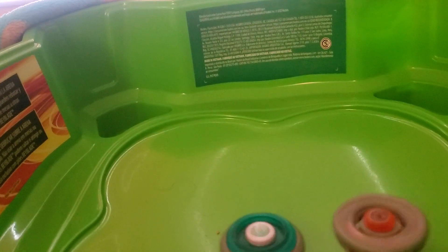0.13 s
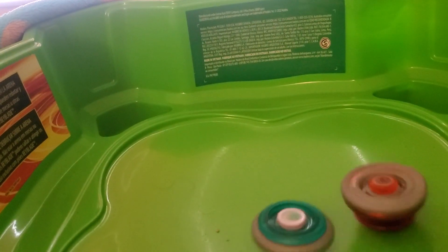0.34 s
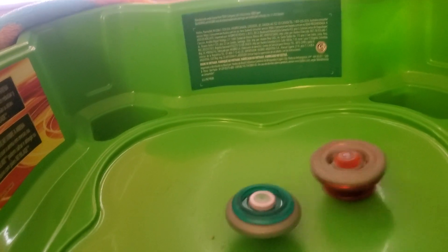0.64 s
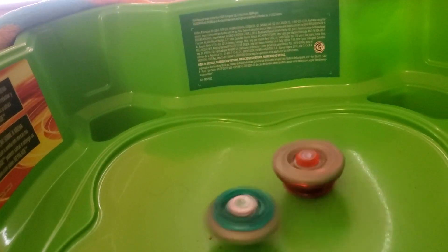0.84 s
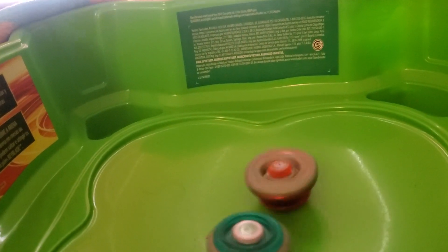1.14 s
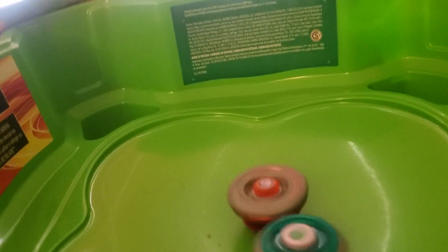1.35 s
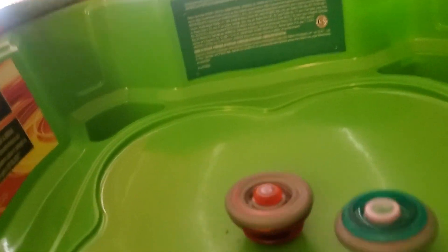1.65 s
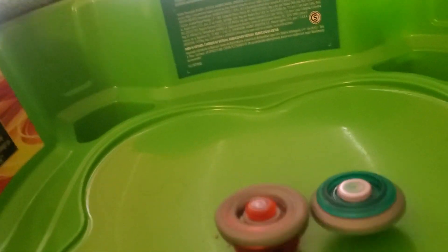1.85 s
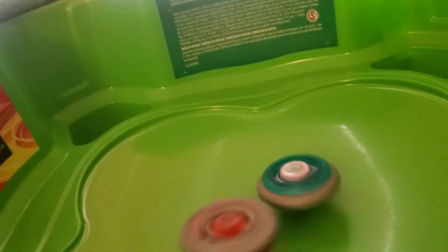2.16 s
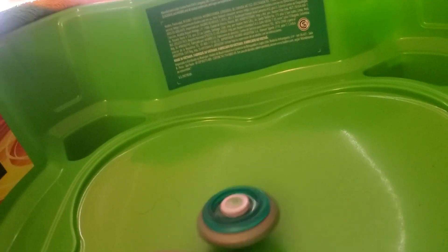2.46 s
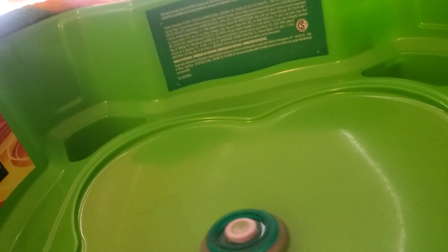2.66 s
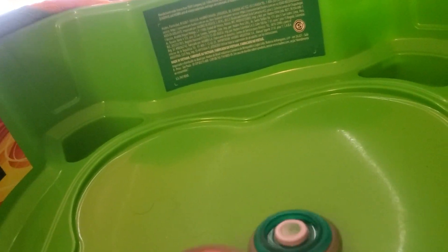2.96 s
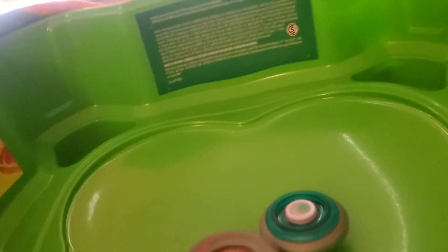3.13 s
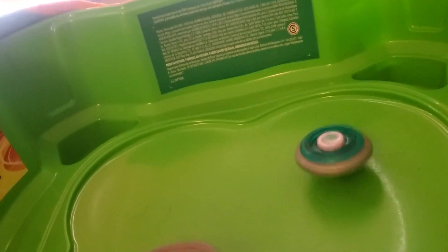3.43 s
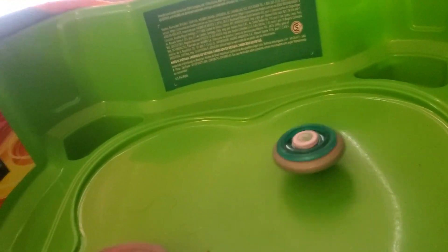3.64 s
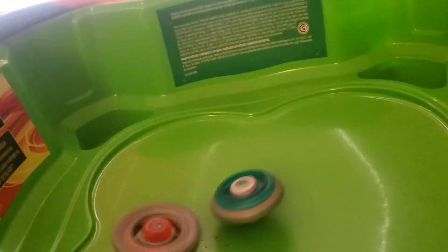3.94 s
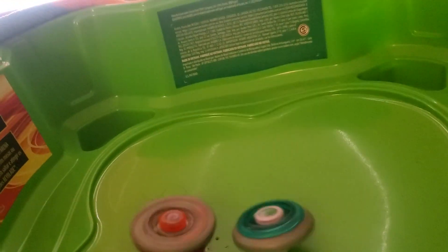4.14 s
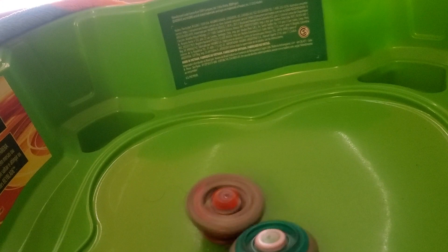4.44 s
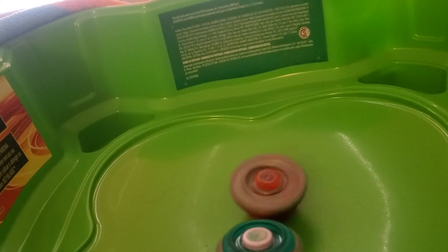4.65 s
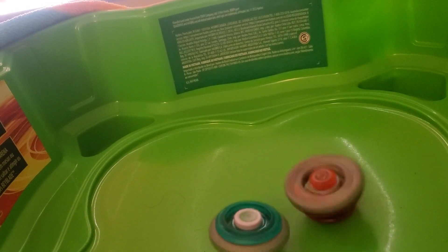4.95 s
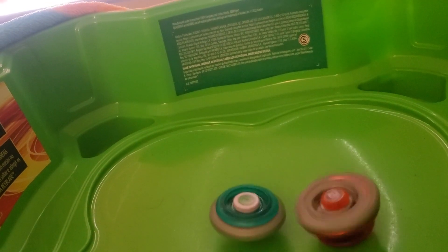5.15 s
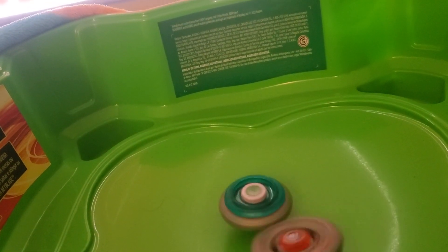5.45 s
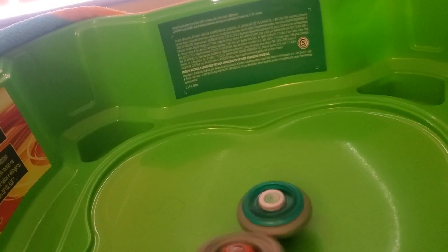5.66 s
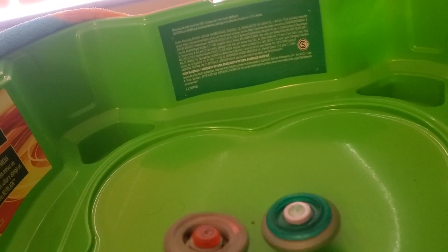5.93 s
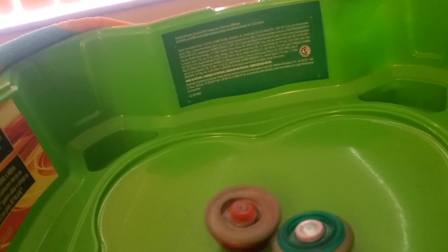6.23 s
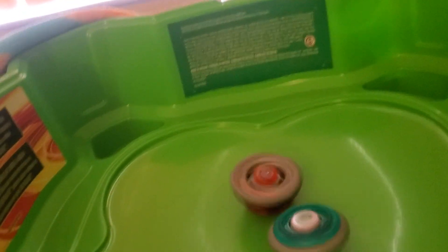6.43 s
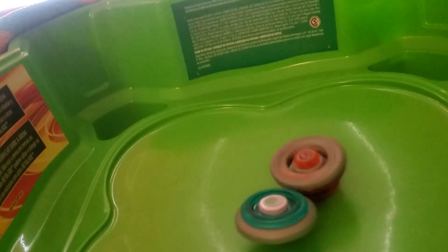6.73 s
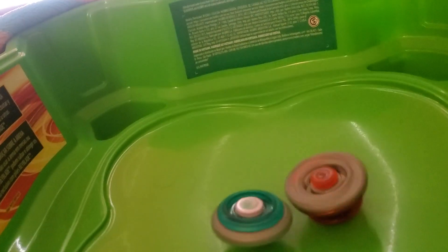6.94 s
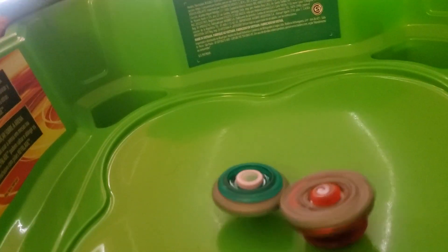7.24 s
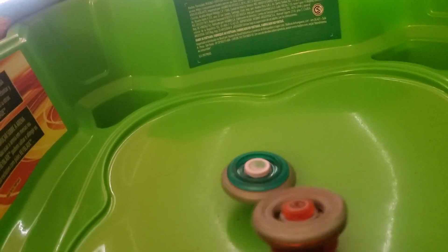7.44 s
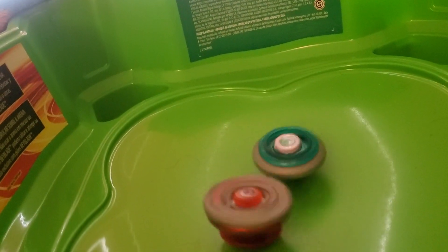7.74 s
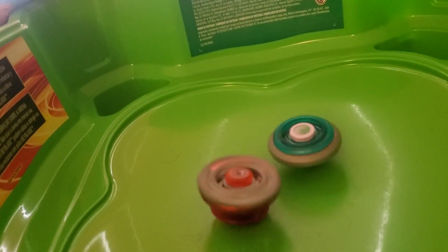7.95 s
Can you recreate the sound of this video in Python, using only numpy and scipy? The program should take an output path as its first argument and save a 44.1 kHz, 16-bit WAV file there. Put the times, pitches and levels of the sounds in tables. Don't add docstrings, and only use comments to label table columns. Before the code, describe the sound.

Two spinning tops with metal rings circle in a thin plastic arena, recorded very close in stereo in a small room. Sharp clacks come every few tenths of a second, some ringing metallically, with hollow booms as tips hop and land. After a busy first half the rims only tick and rub softly over rolling rumble, then one hard clash and several spaced clacks follow.

```python
import sys
import numpy as np
from scipy import signal
from scipy.fft import rfft, irfft, next_fast_len
from scipy.io import wavfile

SR = 44100
rng = np.random.default_rng(int(sys.argv[2]) if len(sys.argv) > 2 else 0)


def convert_level_to_amplitude(level_db):
    exponent = np.asarray(level_db, float) / 20
    return 10 ** exponent


def transcribe(signal):
    frames = np.atleast_2d(signal).T
    limited = np.clip(frames, -1, 1)
    pcm = np.round(limited * 32767).astype(np.int16)
    wavfile.write(sys.argv[1], SR, pcm)


N = 356769
SIZE = next_fast_len(N + SR)
HZ = np.maximum(np.arange(SIZE // 2 + 1) * SR / SIZE, 1)

# start_s, crack_db, blow_db (into arena and room)
RIM_CLACKS = [(0.168, -11, -41), (0.174, -11, -36), (0.1802, -11.5, -20.5), (0.5431, -13, -37),
              (0.553, -16, -20.5), (0.9284, -7.5, -21.5), (1.3327, -5.5, -26.5), (1.4525, -8.5, -47),
              (1.5, -15.5, -28.5), (1.906, -7.5, -25), (1.996, -12, -47), (2.1342, -19.5, -33),
              (2.146, -13.5, -45.5), (2.2345, -12.5, -18.5), (2.7014, -8.5, -41.5), (2.7128, -11, -24),
              (3.1346, -15.5, -27.5), (3.2849, -11, -35), (3.29, -22, -47.5), (3.3449, -19.5, -47),
              (3.4279, -8.5, -17.5), (4.104, -10.5, -38), (4.1142, -8, -31), (4.373, -8.5, -27.5),
              (4.57, -23, -39), (4.592, -26, -70.5), (6.352, -11, -26), (6.8208, -9, -38.5),
              (6.998, -14.5, -34), (7.322, -11, -57), (7.777, -4.5, -51)]
# time_s, rumble_db
ROLLING_WEIGHT = [(0.0, -43.5), (0.7, -42.5), (0.81, -73), (0.93, -50), (1.8, -49), (2.6, -46.5),
                  (2.86, -47), (2.97, -64.5), (3.13, -45.5), (3.85, -47.5), (4.02, -35.5), (4.55, -52.5),
                  (4.66, -39), (4.87, -37), (4.96, -42), (6.1, -39.5), (7.3, -46), (8.09, -47.5)]
# pitch_hz, level_db (per Hz)
TICK_COLOUR = [(2940, -36.5), (5000, -11.5), (6690, 1), (9000, -12.5), (11000, -3.5), (14400, -5.5),
               (15900, -1.5), (17000, -30.5)]


def at_hz(points):
    hz, value = np.array(points, float).T
    return np.interp(np.log(HZ), np.log(np.maximum(hz, 1)), value)


def causal(db):
    grid = np.linspace(0, SR / 2, 8193)
    cepstrum = irfft(np.interp(grid, HZ, db) * np.log(10) / 20)
    cepstrum[1:8192] *= 2
    cepstrum[8193:] = 0
    return convert_level_to_amplitude(db) * np.exp(1j * np.interp(HZ, grid, rfft(cepstrum).imag))


def coloured(x, spectrum):
    return irfft(rfft(x, SIZE) * causal(at_hz(spectrum)), SIZE)[..., :N]


def filtered(x, hz, kind="low"):
    return signal.sosfilt(signal.butter(2, hz, kind, fs=SR, output="sos"), x)


def rms_one(x):
    return x / np.sqrt(np.mean(x ** 2) + 1e-20)


def clicks(times, sizes):
    track = np.full(N, 1e-18, dtype=np.asarray(sizes).dtype)
    np.add.at(track, np.minimum((np.asarray(times) * SR).astype(int), N - 1), sizes)
    return track


def decay(push, t60):
    return signal.lfilter([1], [1, -convert_level_to_amplitude(-60 / (t60 * SR))], push)


def burst(push, t60):
    return decay(push, t60) * rng.standard_normal(N)


def ring(push, hz, t60):
    return signal.lfilter([1], [1, -convert_level_to_amplitude(-60 / (t60 * SR)) * np.exp(2j * np.pi * hz / SR)], push)


def sing(push, hz, t60):
    swell_s = 0.00068
    keep = np.array([convert_level_to_amplitude(-60 / (t60 * SR)), np.exp(-1 / (swell_s * SR))])
    return signal.lfilter([1 - keep[1]], np.poly(keep * np.exp(2j * np.pi * hz / SR)), push)


def patter(turn, per_s, spread_db, wobble):
    rate = per_s * np.exp(wobble * np.cos(turn))
    sizes = convert_level_to_amplitude(spread_db * np.minimum(rng.exponential(1, N), 4)) * rng.choice([-1, 1], N)
    return sizes * (rng.random(N) < rate / SR) + 1e-18


def room_hush():
    # pitch_hz, level_db (per Hz)
    hush_colour = [(18, -46.5), (30, 1), (76, 6.5), (383, -21), (541, -38.5), (705, -12), (2590, -28),
                   (4280, -23.5), (8090, -35.5), (14100, -35.5), (17000, -60.5)]
    hush_db, shake_db = -54.5, -71.5
    shared, own = rng.standard_normal(N), rng.standard_normal((2, N))
    hush = convert_level_to_amplitude(hush_db) * rms_one(coloured(shared + 1.5 * own, hush_colour))
    shake = filtered(own[0], [25, 90], "band")
    return hush + convert_level_to_amplitude(shake_db) * rms_one(shake) * [[1], [-1]]


def room(x):
    # pitch_hz, t60_s
    room_decay = [(400, 0.2), (1000, 0.26), (4000, 0.29), (9000, 0.26), (16000, 0.11)]
    decay_hz, decay_s = np.transpose(room_decay)
    t = np.arange(SR // 2) / SR
    edges = 300 * 2 ** np.arange(0, 6.1, 1)
    tail = 0
    for low, high in zip(edges, edges[1:]):
        band = filtered(rng.standard_normal((2, len(t))), [low, high], "band")
        t60 = np.interp(np.log(low * high) / 2, np.log(decay_hz), decay_s)
        tail = tail + band * convert_level_to_amplitude(-60 * t / t60) * np.clip(t / 0.00043, 0, 1)
    tail = tail / np.sqrt(np.sum(tail ** 2, axis=1, keepdims=True))
    return irfft(rfft(x, SIZE) * rfft(tail, SIZE), SIZE)[:, :N]


def arena(push, tilt_db, deep_push=None):
    # pitch_hz, level_db, t60_s
    floor_modes = [(57.1, -7, 0.31), (70.8, -1.5, 0.14), (145.8, 1, 0.12), (213.7, -4, 0.062),
                   (282.2, -6, 0.057), (351.7, -9.5, 0.061), (398, -11, 0.042), (727, -14.5, 0.02),
                   (1000, -15.5, 0.013), (1300, -15, 0.011), (1710, -18.5, 0.015), (1850, -15.5, 0.0025)]
    out = 0
    for k, (hz, level_db, t60) in enumerate(floor_modes):
        r, w = convert_level_to_amplitude(-60 / (t60 * SR)), 2 * np.pi * hz / SR
        gain = (-1) ** k * convert_level_to_amplitude(level_db + tilt_db * np.log2(hz / 144))
        drive = push if deep_push is None or k > 1 else deep_push
        out = out + signal.lfilter([0, gain * np.sin(w)], [1, -2 * r * np.cos(w), r * r], drive)
    return out


def skidding():
    # start_s, rumble_db, length_s, scuff_db (against the rumble)
    jolts = [(0.134, -38, 0.037, -4), (0.54, -28, 0.082, -11.5), (0.928, -31.5, 0.049, -10),
             (1.32, -43.5, 0.075, -4), (1.438, -37, 0.023, -30), (1.505, -43, 0.051, 1),
             (1.901, -34.5, 0.0099, -9.5), (1.98, -39.5, 0.065, -27), (2.135, -36, 0.025, -9),
             (2.226, -27, 0.076, -11), (2.707, -31.5, 0.036, -2.5), (3.146, -40, 0.041, -11),
             (3.278, -33.5, 0.0092, -9), (3.333, -27.5, 0.019, -33), (3.42, -30, 0.14, -3.5),
             (4.099, -28, 0.1, -17), (4.365, -30.5, 0.012, -12), (4.562, -45.5, 0.02, -0.5),
             (4.592, -50.5, 0.21, -18), (6.354, -27, 0.014, -53), (6.781, -49, 0.054, -31),
             (6.973, -40.5, 0.039, -30), (7.316, -39.5, 0.016, -29), (7.759, -29.5, 0.021, -10)]
    ease_s, start_db = 0.08, 4.5
    rumble_fall, scuff_fall = 221, 263
    t = np.arange(0, N, 32)[:, None] / SR
    rolling_db = np.interp(t[:, 0], *np.transpose(ROLLING_WEIGHT))
    s, jolt_db, length, scuff_db = np.transpose(jolts)
    clack_s = np.array(RIM_CLACKS)[:, :1]
    s = clack_s[np.abs(clack_s - s).argmin(axis=0), 0]
    skid_db = jolt_db + start_db * np.clip(1 - (t - s) / ease_s, 0, 1)
    past = np.maximum(t - s - length, 0)
    rumble = convert_level_to_amplitude(rolling_db) + np.sum((t >= s) * convert_level_to_amplitude(skid_db - rumble_fall * past), axis=1)
    scuff = convert_level_to_amplitude(-56.5 + 0.31 * (rolling_db + 43.5))
    scuff = scuff + np.sum((t >= s) * convert_level_to_amplitude(jolt_db + scuff_db - scuff_fall * past), axis=1)
    return [np.interp(np.arange(N) / SR, t[:, 0], gain) for gain in (rumble, scuff)]


def tips(turn, tick_db):
    rolling_depth = [4, -3, 0.5, -0.5, 4, 4, 6, 8, 6, 8.5, -3, 5.5, -1.5, -1.5, 4.5, 4, 1, -3]
    rumble_gain, scuff_gain = skidding()
    rumble = rms_one(arena(patter(turn, 500, 2.75, .4), 0.84))
    deep = filtered(rumble, 100)
    depth_db = np.interp(np.arange(N) / SR, np.array(ROLLING_WEIGHT)[:, 0], rolling_depth)
    rumble = rumble + deep * (convert_level_to_amplitude(depth_db) - 1)
    upper = arena(patter(turn, 700, 3.63, 1.1), 3.23)
    scuff = rms_one(filtered(upper, 500, "high"))
    ticks = rms_one(coloured(burst(np.abs(patter(turn, 180, 5.6, 1.0)), .006), TICK_COLOUR))
    return convert_level_to_amplitude(-4.5) * rumble_gain * rumble + convert_level_to_amplitude(-4.0) * scuff_gain * scuff + convert_level_to_amplitude(tick_db + 3.0) * ticks


def all_touches():
    # start_s, shell_db, tick_db
    lone_touches = [(0.5392, -29, -39), (0.641, -34.5, -43), (0.9217, -25, -33), (0.9994, -44.5, -44),
                    (1.0782, -39.5, -50.5), (1.1173, -45, -57), (2.7504, -27, -41), (2.771, -47.5, -52),
                    (3.5904, -29.5, -42), (3.9632, -46.5, -82), (4.1795, -29.5, -41.5), (4.2018, -32, -60),
                    (4.2164, -42.5, -44), (4.226, -30.5, -40), (4.26, -38, -56), (4.2755, -36, -47),
                    (4.314, -40.5, -53), (5.006, -46, -57), (5.3824, -49.5, -53), (5.4944, -66, -58),
                    (5.5515, -61, -55), (6.0476, -41, -52), (6.1071, -42.5, -59), (6.168, -52, -55.5),
                    (6.288, -53.5, -55), (7.158, -48.5, -61), (7.2569, -58, -68), (7.9157, -44.5, -63)]
    # start_s, tick_db, shell_db
    grazes = [(4.845, -51, -60), (4.8633, -53.5, -77), (4.9068, -60, -73), (4.9197, -54, -71),
              (4.9647, -51, -67.5), (5.0233, -47.5, -68), (5.111, -51, -65), (5.313, -51, -79),
              (5.3353, -51, -57), (5.393, -52, -74), (5.436, -51, -70.5), (5.452, -48.5, -66),
              (5.464, -49, -63.5), (5.508, -50, -54), (5.568, -47, -50.5), (5.6112, -50, -63),
              (5.6394, -50, -62), (5.664, -49, -59), (5.723, -51.5, -55.5), (5.7828, -54, -53),
              (5.8055, -53, -66), (5.8165, -60, -66), (5.937, -50, -60.5), (5.986, -56, -51),
              (6.0884, -49, -51), (6.226, -54, -74), (6.265, -49, -57)]
    early_grazes = [
        (0.3712, -53, -49),
        (0.401, -54, -46),
        (0.4314, -48, -47.5),
        (0.4834, -51, -50),
    ]
    middle_grazes = [(3.6914, -55, -60), (3.717, -56, -49.5), (3.7417, -55.5, -62), (3.7698, -61, -69.5),
                     (3.819, -66, -61), (3.869, -67, -66), (3.9128, -62, -58.5), (4.3288, -46.5, -47),
                     (4.5026, -56, -48.5), (4.7083, -56, -57), (4.7317, -55, -60), (4.7492, -52, -82),
                     (4.789, -52, -70)]
    late_grazes = [(6.482, -52, -74), (6.4921, -45, -63), (6.9366, -58, -68), (6.9613, -57, -71.5),
                   (7.118, -49, -56), (7.1816, -48, -62.5), (7.1953, -55, -55), (7.212, -60, -70),
                   (7.247, -54, -58), (7.2757, -55, -68), (7.437, -57, -68), (7.4796, -48, -69),
                   (7.5233, -57.5, -49.5), (7.546, -47.5, -76.5), (7.5664, -50.5, -54), (7.6126, -50, -62),
                   (7.695, -54, -72), (7.7256, -53, -57)]
    stray_grazes = [
        (1.6247, -51, -51),
        (1.7887, -69, -54),
        (2.5726, -71, -60),
        (4.765, -56, -72),
        (4.808, -53, -70),
        (4.823, -55, -70),
        (4.877, -51, -72),
        (6.803, -50, -68.5),
        (6.975, -56, -68),
    ]
    # first_s, last_s, shell_db, rebound_db
    rubs = [
        (5.043, 5.289, -47.5, -6.5),
        (5.851, 6.001, -47, -11),
        (6.622, 6.775, -46, -13),
    ]
    turn_s, rebound_s, rub_tick_db = 0.05, 0.0056, -10.5
    rows = list(lone_touches)
    for group in (grazes, early_grazes, middle_grazes, late_grazes, stray_grazes):
        rows += [(s, shell_db, tick_db - 9) for s, tick_db, shell_db in group]
    for first, last, shell_db, rebound_db in rubs:
        for s in np.linspace(first, last, round((last - first) / turn_s) + 1):
            rows += [(s, shell_db, shell_db + rub_tick_db),
                     (s + rebound_s, shell_db + rebound_db, shell_db + rebound_db + rub_tick_db)]
    return np.transpose(rows)


def touches():
    # pitch_hz, level_db (per Hz)
    shell_colour = [(1470, -50.5), (2500, -17), (3200, -3), (4030, -7), (4800, -7), (5700, -2),
                    (6490, -10.5), (8000, -31), (10400, -46.5), (17600, -120)]
    # start_s, level_db
    hollow_knocks = [
        (5.863, -64),
        (5.91, -63),
        (5.961, -56.5),
        (6.015, -62.5),
        (6.048, -70),
        (6.062, -51.5),
        (6.11, -49),
        (6.164, -56),
    ]
    s, shell_db, tick_db = all_touches()
    shell = coloured(burst(clicks(s, convert_level_to_amplitude(shell_db + 5.0)), 0.051), shell_colour)
    knock_s, knock_db = np.transpose(hollow_knocks)
    hollow = ring(burst(clicks(knock_s, convert_level_to_amplitude(knock_db)), 0.015), 1670, 0.032).imag
    fade = decay(clicks(s, convert_level_to_amplitude(tick_db + 13.0)), 0.012)
    grit = rng.standard_normal(N)
    ticks = fade * [grit, 0.31 * grit + 1.4 * grit[::-1]]
    return shell + hollow + coloured(ticks, TICK_COLOUR)


def grinding():
    # start_s, length_s, level_db
    grinds = [
        (2.265, 0.027, -32.5),
        (3.449, 0.084, -29),
        (4.12, 0.15, -59),
        (6.351, 0.02, -32),
    ]
    # pitch_hz, level_db (per Hz)
    grit_colour = [(600, -25), (1200, -13.5), (4000, -10), (8500, -14.5), (12500, 1), (16000, -2.5),
                   (17000, -73)]
    fall = 332
    t = np.arange(0, N, 32)[:, None] / SR
    s, length, level_db = np.transpose(grinds)
    past = np.maximum(t - s - length, 0)
    gain = np.sum((t >= s) * convert_level_to_amplitude(level_db - fall * past), axis=1)
    grit = patter(0, 3000, 3.0, 0)
    return np.interp(np.arange(N) / SR, t[:, 0], gain) * rms_one(coloured(grit, grit_colour))


def landings():
    # start_s, boom_db, knock_db (knock brightness)
    tip_landings = [(0.54, -36, -23.5), (0.575, -21, -1), (0.611, -18.5, -3.5), (0.635, -27.5, -9),
                    (1.037, -33.5, 6), (1.365, -27.5, -1), (1.504, -22, -18.5), (1.995, -25.5, 1),
                    (2.231, -17.5, -15.5), (2.256, -15.5, -3.5), (2.698, -18.5, -34), (2.752, -23.5, 3.5),
                    (3.13, -24.5, -34), (3.15, -26.5, -14), (3.345, -13, -3), (3.428, -15.5, 3),
                    (3.472, -11, -1.5), (3.504, -19, 6.5), (4.112, -13, 2.5), (4.149, -7.5, -9.5),
                    (4.178, -11.5, -4), (4.202, -18.5, 3), (4.225, -29.5, 10), (4.263, -28, 12),
                    (4.373, -24, 7.5), (6.352, -7.5, -2.5), (6.366, -10, -3), (6.82, -22, -20),
                    (6.998, -15.5, -31), (7.322, -25, -9), (7.771, -17.5, 4)]
    landing_depth = [-1, -0.5, -6, 1, 1.5, 1, -12, -2, -3.5, -2.5, 0.5, 3.5, 1.5, -6.5, -5, -6, -1.5, 1, 0,
                     -8, -8.5, -2, -3.5, 0, 0, -5.5, -5.5, 0, -18, -8, -2]
    s, boom_db, knock_db = np.array(tip_landings).T
    touch_s, shell_db, _ = all_touches()
    nudges = clicks(touch_s, convert_level_to_amplitude(np.minimum(shell_db, -43) + 14))
    blows = [clicks(s, convert_level_to_amplitude(boom_db)) + nudges, clicks(s, convert_level_to_amplitude(boom_db + landing_depth)) + nudges]
    push, deep_push = filtered(blows, 447)
    boom = arena(push, 0.66, deep_push)
    knock = arena(burst(clicks(s, convert_level_to_amplitude(boom_db + knock_db)) + convert_level_to_amplitude(-6.5) * nudges, 0.037), 3.43)
    return convert_level_to_amplitude(-8.0) * boom + convert_level_to_amplitude(-22.5) * filtered(knock, 700, "high")


def body_tones():
    # start_s, pitch_hz, level_db
    struck_tones = [(1.333, 762, -26), (1.333, 3700, -12.5), (1.453, 1240, -18), (1.453, 3530, -14),
                    (1.5, 3320, -15.5), (0.675, 1300, -40), (2.146, 1970, -31), (2.146, 3700, -31.5),
                    (3.135, 694, -43), (3.285, 740, -29), (3.345, 1200, -33.5), (4.104, 760, -33),
                    (4.104, 1290, -32.5), (4.373, 800, -29), (6.821, 1350, -41.5), (6.821, 2150, -20.5),
                    (6.821, 1000, -38.5), (6.998, 1180, -27), (6.998, 970, -25), (7.012, 1120, -29),
                    (7.777, 1090, -29), (7.777, 2030, -32)]
    cycles = 26
    out, t = np.zeros(N + SR), np.arange(SR // 20) / SR
    for s, hz, level_db in struck_tones:
        start = int(s * SR)
        out[start:start + len(t)] += convert_level_to_amplitude(level_db - 60 * t * hz / cycles) * np.sin(2 * np.pi * hz * t)
    return out[:N]


def ring_drives():
    # start_s, then four mode families
    # low to high, each level_db
    ring_blows = [(0.185, -26.5, -55, -52, -33), (0.2, -24, -60, -57, -42), (0.544, -52, -52, -41, -27.5),
                  (0.927, -33.5, -55, -35, -33), (1.3315, -44, -50.5, -49, -43),
                  (1.454, -36, -61.5, -39.5, -22), (1.501, -42, -61, -56, -25),
                  (1.9054, -35.5, -57, -68, -34), (1.992, -28, -33, -58, -33),
                  (2.148, -71, -58.5, -48.5, -42), (2.2345, -26, -37, -25, -25),
                  (2.239, -31.5, -36, -26, -11), (2.259, -32.5, -27.5, -21, -20.5),
                  (2.7015, -22.5, -55, -43, -52), (3.135, -45.5, -43, -41, -23.5),
                  (3.291, -28, -71, -42, -36), (3.3426, -32, -55, -37, -22.5),
                  (3.428, -28, -36, -23.5, -32), (3.446, -38.5, -24, -17, -26.5),
                  (3.463, -35.5, -20, -19.5, -39), (4.103, -57, -59, -41, -41),
                  (4.115, -32, -74, -56, -65.5), (4.3706, -59, -30, -47, -45),
                  (4.571, -27, -23.5, -62.5, -13), (4.592, -43, -41.5, -30, -30.5),
                  (5.092, -67, -55, -69, -65), (5.139, -62, -52, -68, -65), (5.201, -68, -55, -59, -63),
                  (5.239, -64, -49.5, -61, -65), (5.29, -63.5, -63, -65.5, -65),
                  (6.353, -17, -25, -18.5, -12.5), (6.364, -31, -24.5, -25.5, -19),
                  (6.999, -19.5, -24, -23, -13.5), (7.3221, -37.5, -73, -39, -39),
                  (7.7762, -33, -57, -54, -32)]
    # start_s, level_db
    shimmers = [
        (2.262, -24.5),
        (3.446, -26.5),
        (3.472, -28),
        (3.506, -44.5),
        (4.571, -39),
        (6.354, -32),
        (6.369, -35),
        (6.999, -38),
    ]
    rattle_t60_s, first_blow_share, rattle_share = 0.11, 0.92, 0.68
    hits = np.array(ring_blows)
    top_db = hits[:, [1, 3, 4]].mean(axis=1) - 15.5
    hits = np.column_stack([hits, top_db])
    blows = [clicks(hits[:, 0], convert_level_to_amplitude(1.2 * blow_db)) for blow_db in hits[:, 1:].T]
    shimmer_s, shimmer_db = np.transpose(shimmers)
    blows[-1] = blows[-1] + clicks(shimmer_s, convert_level_to_amplitude(shimmer_db))
    keep = convert_level_to_amplitude(-60 / (rattle_t60_s * SR))
    rattle = rng.standard_normal((2, N))
    return [first_blow_share * blow + rattle_share * rattle * np.sqrt(1 - keep ** 2) * decay(blow, rattle_t60_s)
            for blow in blows]


def rings(turn):
    # pitch_hz, lobes (round the ring), family (column of the drives)
    ring_modes = [(4685, 2, 0), (5586, 2, 1), (6034, 2, 2), (13700, 3, 3), (12400, 3, 4), (12850, 2, 4),
                  (13250, 3, 4), (11230, 3, 4), (8100, 2, 4), (10350, 3, 4)]
    # level_db, t60_s, upper_db (upper line against lower)
    mode_tones = [(-0.5, 0.1, -1), (1, 0.088, 2), (1.5, 0.29, 0), (-4.5, 0.1, 0.5), (-1, 0.17, -4.5),
                  (-8, 0.1, 1.5), (-9, .1, 4.5), (-9.5, .09, 1), (-21, 0.065, -6.5), (-25.5, .09, -1)]
    port_angle = 1.33
    drives = ring_drives()
    lines = {1: 0, -1: 0}
    for (hz, lobes, family), (level_db, t60, upper_db) in zip(ring_modes, mode_tones):
        for way, drive in zip((1, -1), drives[family]):
            turning = np.exp(1j * way * lobes * turn)
            push = convert_level_to_amplitude(level_db + way * upper_db / 2 + 5.0) * drive * turning.conj()
            lines[way] = lines[way] + sing(push, hz, t60) * turning
    right = lines[1] * np.exp(1j * port_angle) + lines[-1] * np.exp(-1j * port_angle)
    return np.array([(lines[1] + lines[-1]).imag, right.imag])


def cracks():
    # pitch_hz, level_db (per Hz)
    crack_colour = [(470, -33), (800, -9.5), (2700, -8), (3660, -10), (4220, -7.5), (8630, -9),
                    (11100, -6.5), (12200, -7.5), (13700, -3.5), (15300, -5.5), (17000, -39.5)]
    # pitch_hz, level_db (per Hz)
    wash_colour = [(590, -24.5), (1000, -7.5), (1220, -13), (3300, -13), (5920, -1), (7200, -10.5),
                   (10000, -9), (14100, -4), (16000, -3), (17000, -74)]
    clack_body = [-0.5, -3, -13, -10, -3.5, -1.5, -3.5, 1, 0.5, -0.5, 3.5, -1, -0.5, -10, 1, -8, -1, 2.5, 9,
                  7, -11, 1, 0, -6, -5.5, 5.5, -6.5, 0.5, 0, 3.5, -2]
    clack_pan = [-3, -1.5, -9.5, -8.5, 3.5, -0.5, -1.5, -2, 0, -4, -0.5, -1, 1, -11, 3.5, 0, -5.5, -2, -2,
                 -2, 3, 1, 0.5, 3.5, -14, -5, -3.5, -0.5, -7.5, 0, 0.5]
    split_hz = 4940
    s, crack_db, wash_db = np.transpose(RIM_CLACKS)
    side = convert_level_to_amplitude(np.outer([.5, -.5], clack_pan))
    parts = 0
    for kind, sizes in (("low", convert_level_to_amplitude(crack_db + clack_body + 7.5)), ("high", convert_level_to_amplitude(crack_db + 8.5))):
        push = [clicks(s, sizes * gain) for gain in side]
        direct = decay(push, 0.0036) * rng.standard_normal(N)
        direct = direct + 0.77 * np.array([burst(push[0], 0.017), burst(push[1], 0.017)])
        parts = parts + filtered(direct, split_hz, kind)
    blow = burst(clicks(s, convert_level_to_amplitude(wash_db + 23.5)), 0.0035)
    return coloured(parts, crack_colour), coloured(blow, wash_colour)


def scene():
    # time_s, turns_per_s, tick_db (tip ticks)
    spin = [
        (0.0, 27.5, -84),
        (4.5, 21.9, -81),
        (4.9, 21.3, -75),
        (8.09, 17.5, -78),
    ]
    spin_s, *curves = np.transpose(spin)
    turns_per_s, tick_db = [np.interp(np.arange(N) / SR, spin_s, curve) for curve in curves]
    turn = 2 * np.pi * np.cumsum(turns_per_s) / SR
    crack, blow = cracks()
    singing = rings(turn)
    near = crack + body_tones() + grinding() + touches() + landings() + tips(turn, tick_db)
    return near + singing + room(convert_level_to_amplitude(-11.5) * near + convert_level_to_amplitude(-12.5) * singing + blow) + room_hush()


def band_limit(x):
    return signal.sosfilt(signal.butter(12, 17480, fs=SR, output="sos"), x)


def record(dry):
    # pitch_hz, level_db
    left_colour = [(60, -0.5), (110, 2), (200, -0.5), (380, -1), (700, 1.5), (1290, -9), (2380, 1.5),
                   (4400, 2), (8120, 0.5), (15000, -8.5)]
    # pitch_hz, lead_radians
    left_lead = [(400, 0), (1000, -1.6), (1550, -4), (2330, -6.2), (5940, -6.2), (7920, -12.5),
                 (10600, -18.7), (13600, -26), (17000, -30)]
    limit_db, release_db_per_s, squeeze = -12, 144.5, 0.22
    colour_db = at_hz(left_colour)
    bass_loss = causal(80 * np.log10(np.clip(HZ / 45, .1, 1)))
    half = convert_level_to_amplitude(colour_db / 2) * bass_loss
    late = np.exp(1j * at_hz(left_lead))
    x = irfft(rfft(dry, SIZE) * [half * late, half * convert_level_to_amplitude(-colour_db)], SIZE)[:, :N]
    over_db = np.maximum(20 * np.log10(np.abs(x).max(axis=0) + 1e-9) - limit_db, 0)
    ramp = release_db_per_s * np.arange(N) / SR
    held_db = np.maximum.accumulate(over_db + ramp) - ramp
    duck_db = signal.lfilter([.05], [1, -.95], held_db)
    x = .9 * np.tanh(x * convert_level_to_amplitude(-squeeze * duck_db) / .9)
    x = signal.sosfilt(signal.cheby2(10, 60, 17500, fs=SR, output="sos"), x)
    return band_limit(x)


dry = scene()
out = record(dry)
transcribe(out)
```